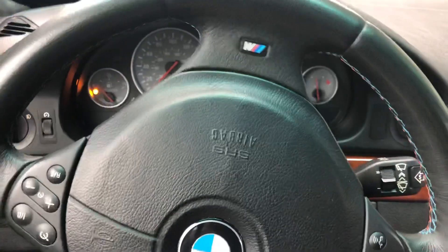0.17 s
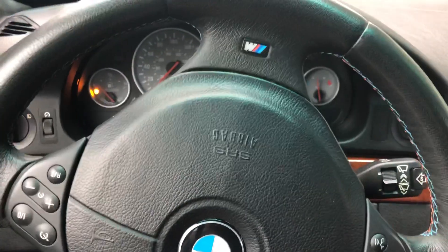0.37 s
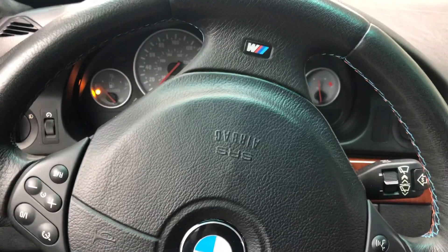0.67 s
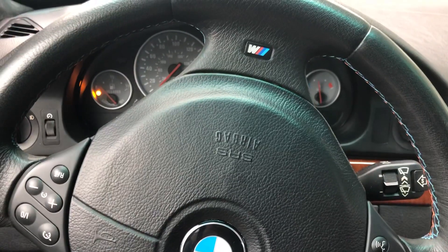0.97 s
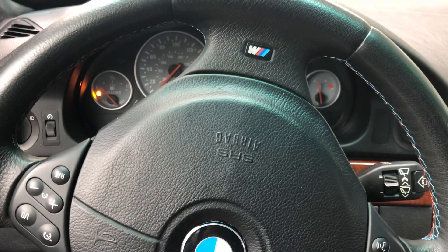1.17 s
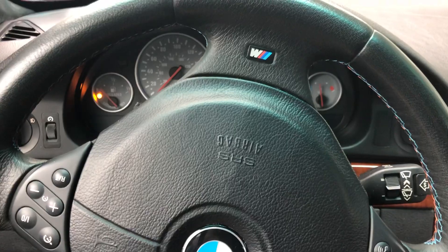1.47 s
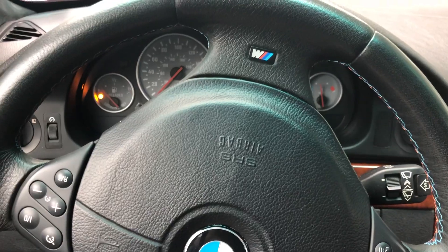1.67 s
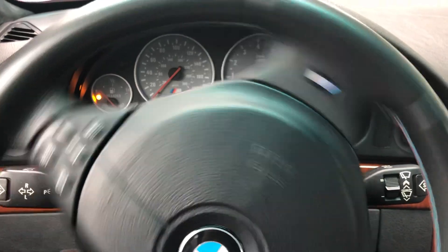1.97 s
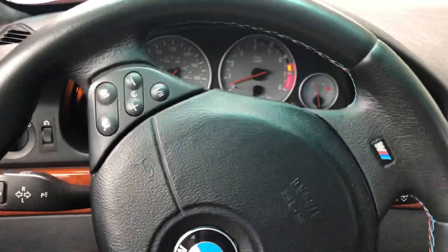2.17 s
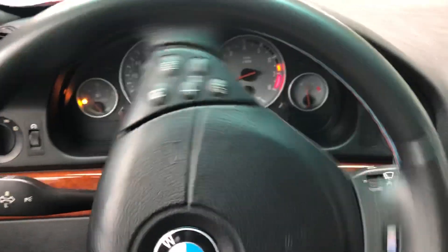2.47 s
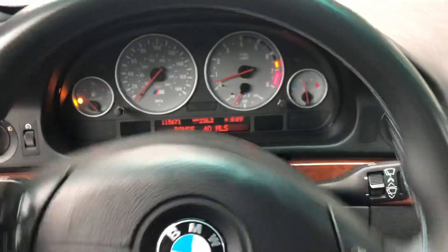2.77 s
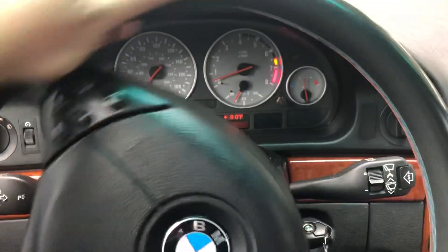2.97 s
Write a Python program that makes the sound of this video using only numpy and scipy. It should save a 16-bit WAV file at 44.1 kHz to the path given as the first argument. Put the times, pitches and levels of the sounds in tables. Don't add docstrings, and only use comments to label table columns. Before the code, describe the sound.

Groaning steering pump whine in a parked idling car, a click, then the wheel spun back

```python
import sys
import numpy as np
from scipy import signal
from scipy.io import wavfile
from scipy.ndimage import uniform_filter1d, map_coordinates

SR = 44100
rng = np.random.default_rng(int(sys.argv[2]) if len(sys.argv) > 2 else 0)


def digitize_waveform(pressure):
    field = np.atleast_2d(pressure).T
    bounded = np.clip(field, -1, 1)
    quanta = np.round(bounded * 32767).astype(np.int16)
    wavfile.write(sys.argv[1], SR, quanta)


def attenuation_scalar(level_db):
    decades = np.asarray(level_db, float) / 20
    return 10 ** decades


N = 137151
T = np.arange(N) / SR

# hz, level_db (per Hz)
BOOM_COLOUR = [(24, -44.5), (38, -7.5), (60, -5.5), (140, -4.5), (200, -12), (320, -18), (480, -18),
               (700, -30), (1100, -78)]
# hz, level_db (per Hz)
BAY_COLOUR = [(240, -25), (400, -17), (440, -15), (550, -7), (582, -21.5), (934, -12.5), (1010, -11.5),
              (1850, -22.5), (4000, -49.5), (5200, -82), (8800, -120)]
# hz, level_db (per Hz)
AIR_COLOUR = [(1470, -23), (2500, -11.5), (3150, -9), (4850, -14), (5750, -18.5), (9000, -17.5),
              (15800, -25.5)]
# multiple_of_firing_rate, level_db (rms), unsteadiness_db
FIRING_ORDERS = [(1, -42.5, 1.55), (1.5, -60, 2), (2.5, -65, 2), (2.95, -67.5, 6), (4, -61, 3),
                 (5, -77, 3.5)]
# time_s, level_db, second_order_db (rms)
FIRING_LEVEL = [(0, -1.5, -51), (.15, -8, -53), (.4, -5, -52), (.6, 3, -45.5), (.8, -2, -55), (1.1, 2, -42),
                (1.5, 0.5, -51), (1.8, 0, -47), (2.3, 1.5, -45), (2.5, 0.5, -48.5), (2.85, 1.5, -54.5),
                (3.0, -8, -52.5), (3.11, -5.5, -47)]
# start_s, peak_db, pitch_hz, t60_s
THUDS = [(0.075, -28.5, 76, 0.09), (0.05, -39, 248, 0.17), (0.0745, -55, 600, .06), (.49, -30.5, 82, 0.088),
         (1.02, -27, 77, 0.1), (1.3, -38, 77, 0.12), (1.8, -33, 81, 0.059), (1.37, -36, 194, 0.11),
         (1.875, -29.5, 76, 0.16), (1.87, -33.5, 188, 0.087), (1.7, -43, 49, .1), (2.116, -43, 570, 0.074),
         (2.1, -53, 600, 0.066), (1.9, -41, 420, .07), (2.125, -37, 330, 0.047), (2.13, -36, 454, 0.063),
         (2.1, -47, 620, 0.087), (2.2, -33, 98.8, 0.13), (1.9, -53, 500, 0.037), (3.7, -53, 650, 0.047),
         (2.41, -28, 77, 0.065), (2.46, -49, 580, 0.19), (2.2, -44, 440, 0.091), (2.67, -50, 730, 0.12),
         (2.2, -48, 1200, 0.089), (2.36, -45, 270, .1), (2.2, -49, 480, 0.054), (3.1, -39, 210, 0.13),
         (2.67, -30, 110, 0.11), (2.681, -33.5, 200, .1), (3.075, -29.5, 67, 0.25), (2.28, -37, 90, 0.14)]
# start_s, peak_db, pitch_hz, t60_s, rise_hz_per_s (the pitch climbs at twice
SLACK = [
    (2.09, -33, 90, 0.22, 855),
]
# start_s, peak_db
CAM_CONTACTS = [
    (1.9313, -38),
    (1.9329, -39),
    (1.9345, -37),
    (1.9369, -40),
    (1.942, -48),
]
# pitch_hz, level_db, t60_s
CAM_MODES = [(2150, -6, .009), (3600, -3, .005), (4150, 0, 0.005), (4900, -2, 0.004), (5900, -3, .004),
             (7000, -8, .003), (11500, -3, 0.003)]
# hz, level_db (per Hz)
CRACK_COLOUR = [(1200, -30), (2200, -12), (4500, 0), (9000, -5), (15800, -13)]
# time_s, friction_db, palm_pressure_db, fingertip_sheen_db
SLIDE = [(0, -66.5, -14, 0), (.15, -73, -3, -9), (.175, -61, -2, -7), (.21, -60.5, -1, -10),
         (.28, -71, 2.5, -7), (.34, -82.5, 2, -10), (1.9, -81, -7, -8), (1.94, -60.5, -5, -8),
         (2.02, -67, -4, -4), (2.11, -65, -6, -7), (2.18, -75, -5, -4), (2.23, -67.5, -1, -4),
         (2.28, -78, 0, -2), (2.37, -66.5, -14, -16), (2.44, -68.5, -13, -13), (2.465, -63.5, -5, -2),
         (2.55, -62, -1, -7), (2.62, -59.5, -6, -9), (2.68, -65.5, -7, -5.5), (2.73, -65, -10, -8),
         (2.8, -69.5, -3.5, -8.5), (3.05, -71.5, -11.5, -9.5), (3.11, -65, -2, -8)]
# hz, level_db (per Hz)
LEATHER_COLOUR = [(1500, -31.5), (2500, -3), (3430, -8), (3930, -3.5), (5660, -3.5), (7500, -7),
                  (10000, -9), (15800, -27.5)]
# hz, level_db (per Hz)
PALM_COLOUR = [(1000, -38.5), (1800, 5), (2300, -1), (2900, -2.5), (3900, -3.5), (5500, -21), (8000, -61.5)]
# hz, level_db (per Hz)
SHEEN_COLOUR = [(5000, -38), (8000, -5.5), (10000, -5), (12400, -1.5), (15800, -2.5)]
# time_s, rate_hz
VANE_RATE = [(0, 124), (.25, 129.2), (.45, 132.5), (.65, 136.2), (.8, 136.8), (.95, 136.8), (1.15, 135.4),
             (1.45, 135.2), (1.75, 133.9), (2.0, 133.5), (2.15, 138.1), (2.3, 141.7), (2.45, 147.8),
             (2.55, 143.4), (2.75, 133.1), (2.95, 124.6), (3.11, 121.5)]
# time_s, groan_db (through the column), octave_db (through the hoses), third_db, whine_db
OIL_LOAD = [(0, -44.5, -58, -56, -48.5), (.16, -35.5, -72, -60, -52.5), (.3, -36, -50, -50.5, -52.5),
            (.42, -42.5, -45, -53, -53.5), (.8, -45, -45, -51.5, -50.5), (1.2, -38.5, -45.5, -53, -51.5),
            (1.92, -45, -46.5, -51, -51.5), (2.02, -31, -51, -56, -52.5), (2.08, -35.5, -52.5, -58, -55),
            (2.12, -55, -55, -68, -51), (2.18, -30.5, -53.5, -74, -70), (2.215, -43, -56, -68, -67),
            (2.26, -35, -52, -66, -65), (2.32, -43.5, -64, -68, -64), (2.38, -47.5, -59, -73, -58),
            (2.47, -26, -50.5, -58, -50), (2.63, -26, -41.5, -58.5, -48.5),
            (2.71, -22.5, -36.5, -57, -46.5), (2.81, -24.5, -37, -61, -50), (2.87, -26.5, -39.5, -60, -53),
            (2.95, -26, -44, -54.5, -48), (3.04, -24, -53.5, -54.5, -50), (3.11, -24, -48.5, -61, -54.5)]
# multiple_of_vane_rate, level_db
WHINE = [(4, -15.5), (5, -19), (6, -22.5), (7, -20), (8, -22.5), (9, -22), (10, -29.5), (11, -29),
         (12, -24), (13, -30.5), (14, -22), (15, -28), (17, -28.5), (18, -30.5), (19, -34), (20, -34.5),
         (35, -40.5), (36, -40), (37, -37.5), (38, -40)]
# centre_hz, width_hz, lift_db
CABIN = [(508.3, 12.7, 13), (648, 14, 7.5), (786, 18, 11.5), (907, 17.6, 10), (1020, 22, 4), (1828, 20, 7)]


def unit(x):
    return x / np.sqrt(np.mean(x ** 2) + 1e-20)


def curves(rows):
    time_s, *columns = np.transpose(rows)
    return [np.interp(T, time_s, column) for column in columns]


def wobble(rate_hz):
    knots = rng.standard_normal(int(N * rate_hz / SR) + 4)
    return map_coordinates(knots, [T * rate_hz])


def rush(spectrum, patchy_db):
    hz, _, z = signal.stft(rng.standard_normal(N + 4096), SR, nperseg=2048)
    patches = uniform_filter1d(rng.standard_normal(z.shape), 12, axis=0)
    patches = unit(uniform_filter1d(patches, 3, axis=1))
    knot_hz, knot_db = np.transpose(spectrum)
    colour = attenuation_scalar(np.interp(np.log(hz + 1), np.log(knot_hz + 1), knot_db))[:, None]
    _, noise = signal.istft(z * colour * attenuation_scalar(patchy_db * patches), nperseg=2048)
    return unit(noise[:N])


def tone(phase, level_db, free_start=True):
    start = free_start * rng.uniform(0, 2 * np.pi)
    return np.sqrt(2) * attenuation_scalar(level_db) * np.sin(phase + start)


def ring(start_s, hz, t60_s, attack_s, scoop_hz_per_s=0):
    t = np.clip(T - start_s, 0, None)
    swing = np.sin(2 * np.pi * t * (hz + scoop_hz_per_s * t))
    return swing * attenuation_scalar(-60 * t / t60_s) * (1 - np.exp(-t / attack_s))


def vane_phase():
    rate_hz = curves(VANE_RATE)[0] * (1 + 0.0005 * wobble(14))
    phase = 2 * np.pi * np.cumsum(rate_hz) / SR
    return phase - phase[-1]


def air():
    return attenuation_scalar(-73.5) * rush(AIR_COLOUR, patchy_db=1.9)


def engine(phase):
    fire = phase / 3.03
    level_db, second_db = curves(FIRING_LEVEL)
    orders = tone(2 * fire, second_db)
    for multiple, db, shake_db in FIRING_ORDERS:
        orders = orders + tone(multiple * fire, db + level_db + min(shake_db, 2) * wobble(8.74))
    boom_db = -45 + 0.13 * level_db + 0.74 * wobble(7.18)
    boom = attenuation_scalar(boom_db) * rush(BOOM_COLOUR, patchy_db=1.5)
    bay = attenuation_scalar(-60 + 0.2 * wobble(4.5)) * rush(BAY_COLOUR, patchy_db=1.13)
    return orders + boom + bay * (1 + 0.15 * np.cos(phase))


def steering_gear():
    out = np.zeros(N)
    for start_s, db, hz, t60_s in THUDS:
        out += attenuation_scalar(db + 2.5) * ring(start_s, hz, t60_s, attack_s=0.0065, scoop_hz_per_s=500)
    for start_s, db, hz, t60_s, rise_hz_per_s in SLACK:
        out += attenuation_scalar(db + 10) * ring(start_s, hz, t60_s, attack_s=0.019, scoop_hz_per_s=rise_hz_per_s)
    return out


def column_cam():
    snap_s, snap_hz, snap_width_s = 1.9318, 4500, 0.00036
    since = T - snap_s
    out = attenuation_scalar(-32) * np.exp(-(since / snap_width_s) ** 2) * np.cos(2 * np.pi * snap_hz * since)
    for start_s, db in CAM_CONTACTS:
        for hz, level_db, t60_s in CAM_MODES:
            struck_hz = hz * rng.normal(1, 0.05)
            out += attenuation_scalar(db + 4 + level_db) * ring(start_s, struck_hz, t60_s, attack_s=0.0005)
    after = np.clip(since, 0, None)
    rattle = attenuation_scalar(-55 - 60 * after / 0.058)
    crack = attenuation_scalar(-53 - 60 * after / 0.015)
    chatter = attenuation_scalar(1.8 * wobble(900)) * rush(CRACK_COLOUR, patchy_db=4)
    return out + (after > 0) * (rattle + crack) * chatter


def hands():
    friction_db, palm_db, sheen_db = curves(SLIDE)
    catch = attenuation_scalar(0.5 * wobble(350) + 0.41 * wobble(40))
    grain = unit(catch * rush(LEATHER_COLOUR, patchy_db=1))
    sheen = attenuation_scalar(sheen_db) * catch * rush(SHEEN_COLOUR, patchy_db=0.7)
    palm = attenuation_scalar(palm_db + 1.2 * wobble(60)) * rush(PALM_COLOUR, patchy_db=3)
    return attenuation_scalar(friction_db) * (grain + sheen + palm)


def pump(phase):
    groan_db, octave_db, third_db, whine_db = curves(OIL_LOAD)
    wander_db, high_wander_db = 0.7, 1.6
    out = -tone(phase, groan_db + wander_db * wobble(12), free_start=False)
    out += tone(2 * phase + np.pi / 2, octave_db + wander_db * wobble(12.85), free_start=False)
    out += tone(3 * phase, third_db + wander_db * wobble(12.5))

    rate_hz = curves(VANE_RATE)[0]
    flutter_rad = 0.035 * wobble(60)
    lock_start_s, lock_end_s, fade_s = 0.099, 2.02, 0.11
    inside_s = np.minimum(T - lock_start_s, lock_end_s - T)
    free = 1 - np.clip(inside_s / fade_s, 0, 1)
    for k, db in WHINE:
        line_db = whine_db + db - max(k - 8, 0) * free
        for centre_hz, width_hz, lift_db in CABIN:
            line_db = line_db + lift_db / (1 + ((k * rate_hz - centre_hz) / width_hz) ** 2)
        line_db = line_db + high_wander_db * min(k / 8, 1.3) * wobble(15)
        out += tone(k * (phase + flutter_rad), line_db)
    return out


def scene():
    phase = vane_phase()
    mix = air() + engine(phase) + steering_gear() + column_cam() + hands() + pump(phase)
    return mix[None]


def top_cut(x):
    return signal.sosfilt(signal.butter(12, 16030, fs=SR, output="sos"), x)


def record(dry):
    band_limit = signal.ellip(12, 0.1, 60, 15790, fs=SR, output="sos")
    kept = signal.sosfiltfilt(band_limit, dry)
    fade = np.sin(np.pi / 2 * np.clip((T[-1] - T) / 0.002, 0, 1))
    return top_cut(kept * fade)


dry = scene()
out = record(dry)
digitize_waveform(out)
```